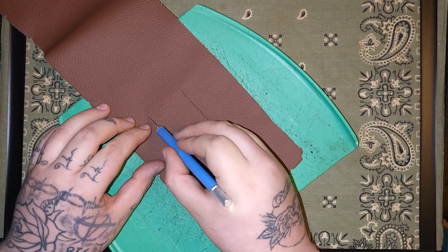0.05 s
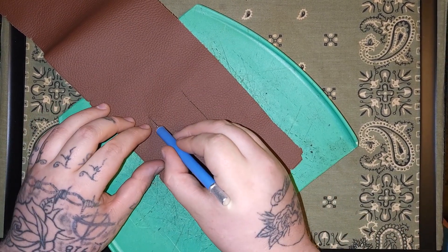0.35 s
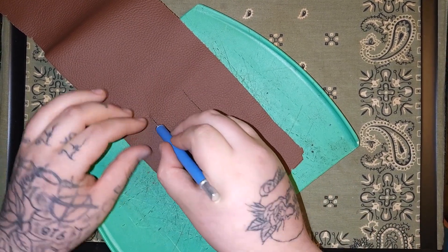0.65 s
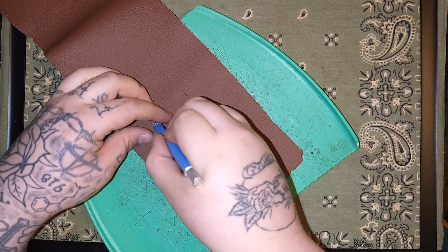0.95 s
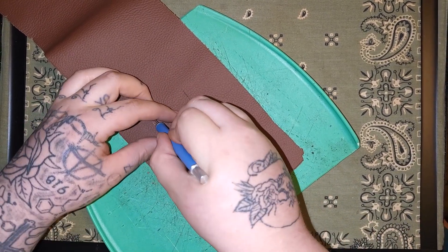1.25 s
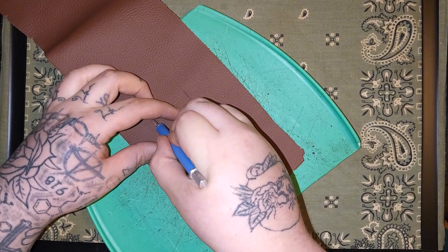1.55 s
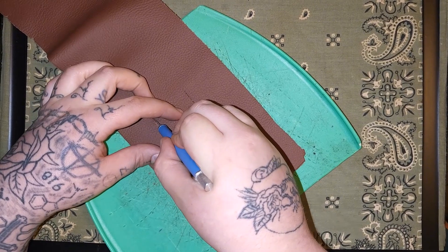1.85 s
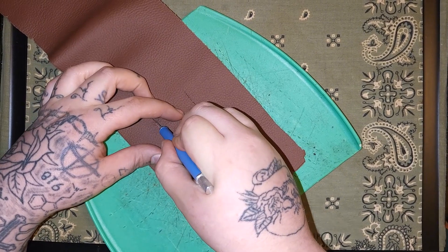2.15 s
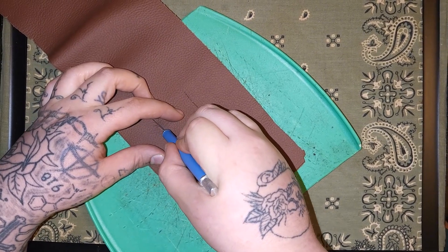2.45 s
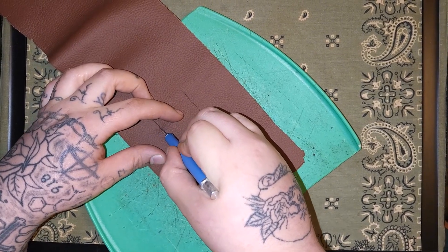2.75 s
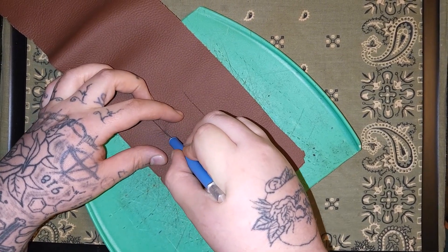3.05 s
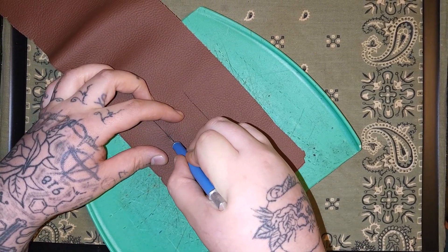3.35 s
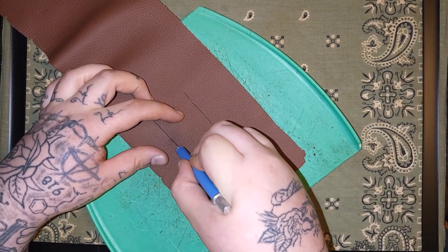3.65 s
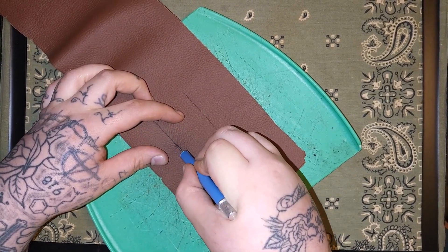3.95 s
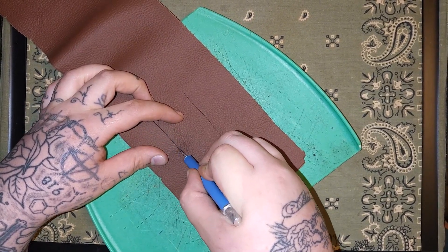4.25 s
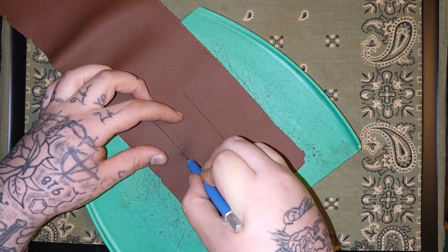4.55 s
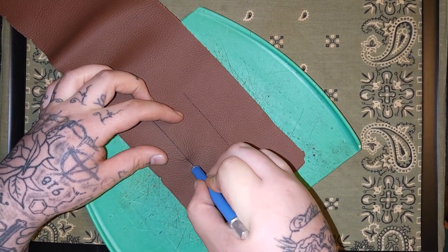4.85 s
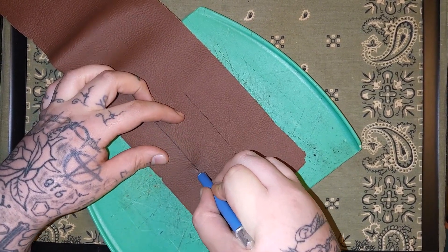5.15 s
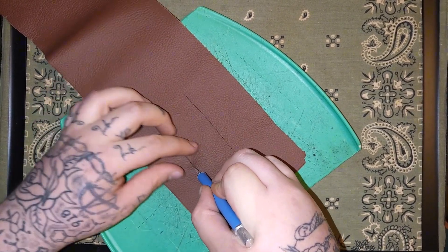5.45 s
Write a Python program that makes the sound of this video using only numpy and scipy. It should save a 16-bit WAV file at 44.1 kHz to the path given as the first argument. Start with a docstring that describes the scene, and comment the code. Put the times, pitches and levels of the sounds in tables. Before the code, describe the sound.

In a quiet room, a hand lands on leather over a plastic cutting mat with a soft thud and a brief rub. A hobby knife makes a few short, scratchy nicks, with one sharp click as the blade is set down. Then comes one long rasping cut in uneven pulls, growing louder as fibres crackle and snap. Small clicks and a faint slide end it. Everything sounds close.

```python
"""Cutting leather with a hobby knife

In a quiet room a hand lands on leather on a plastic cutting mat and slides into place. The blade is
set down with a click, nicks the hide a few times, then makes one long cut in a series of pulls.
Stick-slip friction at the blade drives the resonances of mat, knife and table, while snapping
fibres crackle on top."""
import sys
import numpy as np
from scipy import signal
from scipy.fft import rfft, irfft
from scipy.io import wavfile
from scipy.ndimage import uniform_filter1d, map_coordinates

SR = 44100
rng = np.random.default_rng(int(sys.argv[2]) if len(sys.argv) > 2 else 0)


def wav_record(signal):
    """Record a signal, one row per channel, as 16-bit PCM in the file named by sys.argv[1]."""
    frames = np.transpose(np.atleast_2d(signal))
    bounded = np.clip(frames, -1, 1)
    # unit amplitude maps onto the largest positive 16-bit level
    quanta = np.round(bounded * 32767).astype(np.int16)
    wavfile.write(sys.argv[1], SR, quanta)


N = 242991
TIME = np.arange(N) / SR
FRAME_TIME = TIME[::32]
BINS = np.fft.rfftfreq(8192, 1 / SR)

# spectrum of a snapping fibre: frequency_hz, level_db
FIBRE_SPECTRUM = [(2000, -37), (3700, -14), (4500, -3.5), (5200, -4.5), (6450, 0), (7400, -1.5), (8200, 5),
                  (9000, -15.5), (10500, -3.5), (11500, -1), (14000, -4.5), (16000, -6)]


def amp(db):
    """Decibels to amplitude ratio."""
    return 10 ** (np.asarray(db) / 20)


def unit_rms(x):
    """Normalisation to rms 1."""
    return x / np.sqrt(np.mean(x ** 2) + 1e-20)


def steadied(x, size=3000):
    """Division by the running rms holds the slow level at 1 and keeps the quick flutter."""
    return x / np.sqrt(uniform_filter1d(uniform_filter1d(x ** 2, size), size // 2) + 1e-9)


def curve_at(points, hz):
    """Interpolation on a log-frequency axis."""
    f, value = np.transpose(points)
    return np.interp(np.log(hz + 1), np.log(f + 1), value)


def add(mix, start_s, sound):
    """Superposition of a sound on the mix."""
    part = mix[round(start_s * SR):][:len(sound)]
    part += sound[:len(part)]


def peaks(hz, width, db, steep=1.886):
    """Gain on BINS of resonances whose powers add."""
    shape = 1 / (1 + ((BINS[:, None] - hz) / (width * 0.64)) ** 2) ** steep
    return np.sqrt(shape @ amp(db) ** 2)


def colour(x, gain):
    """Minimum-phase filter shaped by a gain on BINS: sharp attack, ringing after."""
    log_gain = np.log(np.maximum(gain / gain.max(), 1e-5))
    mirrored = np.concatenate([log_gain, log_gain[-2:0:-1]])
    response = np.fft.ifft(np.exp(np.conj(signal.hilbert(mirrored)))).real
    return signal.oaconvolve(x, response[:len(BINS)])[:len(x)]


def noise(spectrum):
    """Stationary noise of rms 1 with the given spectrum."""
    gain = amp(curve_at(spectrum, np.fft.rfftfreq(N, 1 / SR)))
    return unit_rms(irfft(rfft(rng.standard_normal(N)) * gain, N))


def wander(low_hz, high_hz):
    """Band-pass noise: a random drift of rms 1."""
    f = np.fft.rfftfreq(N, 1 / SR)
    gain = f / (f + low_hz) / (1 + (f / high_hz) ** 2)
    return unit_rms(irfft(rfft(rng.standard_normal(N)) * gain, N))


def grains(per_s, spread_db):
    """Poisson impulses of uneven size."""
    size = amp(spread_db * np.minimum(rng.exponential(1, N), 4)) * rng.choice([-1, 1], N)
    return unit_rms(size * (rng.random(N) < per_s / SR))


def swells(gestures, db, attack_s, release_s, arch_db, law=1):
    """Envelope in dB: each gesture rises, arches and dies, by 20 * law dB per attack or release."""
    start, length = np.transpose(gestures)[:2, :, None]
    age = FRAME_TIME - start
    arch = arch_db * (2 * np.clip(age / length, 0, 1) - 1) ** 2
    ends = 20 * (np.maximum(-age, 0) / attack_s + np.maximum(age - length, 0) / release_s)
    return np.max(db[:, None] - law * (arch + ends), axis=0)


def fader(db):
    """Interpolation from a level per frame to a gain per sample."""
    return np.interp(TIME, FRAME_TIME, amp(db))


def background(rumble_db=-60, air_db=-65, whine_db=-79.5, lean_db=-1, apart_db=-13):
    """Ambient noise: rumble and table sway are largely coherent at the two ports, hiss largely not."""
    # spectra of room rumble, table sway, hiss and a narrow band in it: frequency_hz, level_db
    rumble = [(12, -80), (20, 2), (64, 6), (102, 1.5), (120, -3), (155, -10.5), (236, -12), (256, -12.5),
              (277, -66), (300, -33), (390, -58), (660, -120)]
    sway = [(30, 11.5), (60, -20), (80, 16.5), (105, -0.5), (140, -3), (220, -38)]
    air = [(150, -60), (250, -2), (528, -1.5), (1140, -10), (1850, -12), (2530, -14.5), (2860, -13),
           (3280, -16.5), (4050, -13.5), (4410, -17.5), (6590, -22.5), (7310, -13), (9660, -33),
           (10700, -26.5), (16000, -23)]
    whine = [(3000, -48), (3850, -23), (4030, 2), (4220, -37), (5400, -58)]
    # sway under the weight of the arms: time_s, level_db
    arm_weight = [(0, -82), (0.6, -61.5), (2.6, -60), (3.6, -69), (4.5, -56), (5.5, -57.5)]
    leaning = amp(lean_db + np.interp(TIME, *np.transpose(arm_weight)))
    low = amp(rumble_db) * noise(rumble) + leaning * noise(sway)
    incoherent = [amp(air_db) * noise(air) + amp(whine_db) * noise(whine)
                  + amp(rumble_db + apart_db) * noise(rumble) for _ in range(2)]
    return low + np.array(incoherent) + 0.23 * amp(air_db) * noise(air)


def crack(spectrum, contact_s, size=2000):
    """Contact transient: a noise burst whose time constant is the contact time."""
    t = np.arange(size) / SR
    x = colour(rng.standard_normal(size) * np.exp(-t / contact_s), amp(curve_at(spectrum, BINS)))
    return x / np.sqrt(np.sum(x ** 2) / (contact_s * SR))


def ring(modes, rise_s=0.00084, size=8000):
    """Free vibration of a struck body: damped sines, rms 1 over the first few milliseconds."""
    t = np.arange(size) / SR
    x = sum(amp(db - 60 * t / t60) * np.sin(2 * np.pi * (hz * t + rng.random()))
            for hz, db, t60 in modes)
    x *= 1 - np.exp(-(t / rise_s) ** 2)
    return x / np.sqrt(np.mean(x[:size // 25] ** 2))


def taps():
    """Impact excitation: hard contacts mostly click and knock, soft ones mostly thud."""
    # blade, handle and fingers landing: start_s, click_db, knock_db, thud_db, thud_hz, contact_s
    contacts = [(0.533, -62, -59, -67, 300, 0.0033), (0.583, -62, -57.5, -61, 304, 0.0086),
                (0.595, -60, -56, -68, 300, 0.015), (0.608, -55, -60, -71, 310, 0.0051),
                (.648, -78, -64, -35.5, 251, 0.0033), (0.658, -80, -63, -41, 219, 0.0027),
                (1.274, -67, -56, -43, 336, 0.019), (1.3129, -35, -37.5, -45.5, 332, 0.0017),
                (1.3982, -56, -48, -59, 311, 0.0017), (1.5458, -24, -31, -36, 350.3, 0.0028),
                (1.5488, -25, -35, -39, 358, 0.0013), (3.206, -70, -52, -51, 339, .002),
                (5.084, -60, -59, -43.5, 344, .002), (5.291, -51, -53.5, -60, 342, 0.0007),
                (5.324, -42, -49, -55.5, 342, 0.00071), (5.3702, -31, -47, -66, 335, 0.0005)]
    # spectrum of a click: frequency_hz, level_db
    click = [(900, -9), (1700, 4), (2100, 7), (2450, -7), (3100, 0), (3700, -11), (4600, -0.5),
             (6400, -0.5), (7900, 7), (9200, -5.5), (11300, 5.5), (16000, -5)]
    # modes of the table struck from above: pitch_hz, level_db, t60_s
    knock = [(349, -20, 0.057), (523, 12.5, 0.0085), (790, 0, 0.053), (926, 6, 0.042), (1036, 4, 0.046),
             (1245, 1, 0.041), (1340, 7.5, 0.025), (1557, -6, 0.062)]
    # its modes under a soft blow: pitch_ratio, level_db, t60_s
    thud = [(.8, -21, 0.078), (1, -10, 0.095), (1.35, -10.5, 0.029)]
    out = np.zeros(N)
    for start_s, click_db, knock_db, thud_db, thud_hz, contact_s in contacts:
        add(out, start_s, amp(click_db) * crack(click, contact_s))
        add(out, start_s + 0.00089, amp(knock_db) * ring(knock))
        thud_modes = [(ratio * thud_hz, db, t60) for ratio, db, t60 in thud]
        add(out, start_s, amp(thud_db) * ring(thud_modes, rise_s=0.0017))
    return out


def hand_slides(hiss_gain_db=6.5, broadband_db=-9):
    """Sliding friction: skin on the grain gives fine, dense impulses that ring the hide."""
    # moves of the hand: start_s, length_s, rub_db, hiss_db
    slides = [(0.677, 0.071, -42, -52), (0.776, 0.097, -45.5, -55), (0.905, 0.053, -52.5, -63),
              (5.296, 0.055, -56, -55.5), (5.375, .015, -58.5, -53), (5.428, 0.035, -56.5, -65)]
    # modes of leather and mat: pitch_hz, width_hz, level_db
    hide_modes = [(347, 27, 1.5), (678, 107, -3.5), (1026, 52, 0.5), (1198, 40, 3), (1605, 60, -11),
                  (1890, 30, -3), (2110, 280, -8), (2498, 100, -8), (2880, 51, -35.5), (3380, 110, -17)]
    # spectra of the broad rub and the hiss of skin: frequency_hz, level_db
    rub_spectrum = [(150, -7), (300, -5), (480, -28), (700, -3), (1200, -9), (1450, -12.5), (2500, -10),
                    (3600, -12.5), (4500, -13.5), (6000, -26)]
    skin_spectrum = [(2240, -65), (3800, -26), (4500, -9), (6570, 4), (7960, 15.5), (8560, 7.5), (9310, 9),
                     (10300, 6), (11800, 6), (15200, 6), (16000, 14)]
    friction = grains(per_s=13000, spread_db=2.5) * amp(0.5 * wander(13, 80))
    broadband = amp(broadband_db + curve_at(rub_spectrum, BINS))
    body = np.hypot(peaks(*np.transpose(hide_modes), steep=1.94), broadband)
    rub = steadied(colour(friction, body))
    hiss = steadied(colour(friction, amp(curve_at(skin_spectrum, BINS))))
    rubbing, hissing = (fader(swells(slides, db, attack_s=0.034, release_s=0.083, arch_db=3.5))
                        for db in np.transpose(slides)[2:])
    return rub * rubbing + amp(hiss_gain_db) * hiss * hissing


def nicks(edge_law, fibre_law):
    """Brief loading by the tip: envelopes in dB of mat drag, edge rasp, fibres and table thrum."""
    # short strokes: start_s, length_s, drag_db, rasp_db, fibre_db, thrum_db
    strokes = [(0.983, 0.086, -48.5, -67.5, -53.5, -62), (1.126, 0.053, -48, -68.5, -60, -48),
               (1.275, 0.02, -52, -70, -61.5, -47), (1.313, 0.014, -58, -64, -56, -49),
               (1.398, 0.066, -46.5, -68.5, -56.5, -56), (1.512, 0.029, -49.5, -72, -63.5, -58),
               (1.558, 0.065, -39, -58, -48.5, -51.5), (1.701, 0.043, -49.5, -70, -65.5, -60),
               (1.855, 0.022, -60, -86, -76, -69), (1.981, 0.048, -47.5, -63.5, -59.5, -62),
               (2.048, 0.026, -48.5, -73, -68, -68), (2.18, 0.039, -56.5, -85, -82, -72),
               (2.297, 0.18, -46, -66.5, -65.5, -63), (2.353, 0.066, -38.5, -50, -47, -54.5),
               (2.511, 0.024, -42.5, -64.5, -58, -69), (2.724, 0.091, -37.5, -47.5, -44.5, -49)]
    return [swells(strokes, db, attack_s=0.033, release_s=0.054, arch_db=5, law=law)
            for db, law in zip(np.transpose(strokes)[2:], (1, edge_law, fibre_law, 1))]


def resonances(x, modes, travel):
    """Forced vibration: modes change strength as the driving point travels from 0 to 1."""
    hz, width, first_db, last_db = np.transpose(modes)
    first, last = (unit_rms(colour(x, peaks(hz, width, db))) for db in (first_db, last_db))
    return (1 - travel) * first + travel * last


def creak(jolts, pitch_hz=935, width_hz=74):
    """Resonance: one mode of the mat sings out under the tip before the cut deepens."""
    # strength against the other modes: time_s, level_db
    strength = [(1.6, -8), (2.0, 4), (3.3, -12.5), (4.0, -43)]
    mode = unit_rms(colour(jolts, peaks(pitch_hz, width_hz, db=[0])))
    return mode * amp(np.interp(TIME, *np.transpose(strength)))


def gap_echo(x, depth=0.3):
    """Comb filtering: one close reflection cuts notches that slide as the hand moves."""
    # path across the gap under the hand: time_s, delay_s
    gap = [(2.4, 0.00065), (3.8, 0.00048), (4.8, 0.000626)]
    delay = np.interp(TIME, *np.transpose(gap)) * SR
    return x - depth * map_coordinates(x, [np.arange(N) - delay], order=3)


def blade(mat_db=-1.5, fibre_db=0.44, table_db=-1.0, spray_s=0.0014):
    """Stick-slip friction: jolts ring mat, knife and table, and each frees a spray of snapping fibres."""
    # modes of the mat and of blade with handle: pitch_hz, width_hz, first_db, last_db
    mat_modes = [(555, 39, -9.5, -22), (686, 61, -13, -4.5), (803, 88, -24, 2.5), (893, 22, 2.5, 4.5),
                 (984, 88, 4, -14), (1102, 145, -0.5, -3), (1287, 57, 0, -1), (1401, 142, -5.5, -9.5),
                 (1553, 28, -5.5, -18), (1680, 72, -20, -15)]
    knife_modes = [(2116, 280, -11.5, 5), (2420, 240, -12, -2), (2534, 195, 2.5, 6), (2750, 124, 2.5, 10),
                   (3026, 200, 2.5, 0.5), (3346, 220, 1.5, -16), (3590, 320, -7, 0),
                   (4040, 1200, -11.5, -22)]
    # modes of the table beneath: pitch_hz, width_hz, level_db
    table_modes = [(249.7, 23, -11.5), (347.7, 12, 3.5), (381, 58, -7)]
    travel = np.interp(TIME, [3.0, 3.9, 4.4, 4.8], [0, .18, .5, 1])
    grip = amp(wander(5.8, 71))  # the hide is uneven, so the edge bites and eases
    slips = grains(per_s=640, spread_db=0.5)
    jolts = (slips + 0.56 * rng.standard_normal(N)) * grip
    spray = unit_rms(signal.lfilter([1], [1, -np.exp(-1 / (spray_s * SR))], abs(slips)))
    fine_snaps = grains(per_s=6000, spread_db=3.0) + rng.standard_normal(N)
    coarse_snaps = grains(per_s=110, spread_db=2.0)
    snaps = unit_rms(fine_snaps * (0.61 + spray) * grip) + 0.13 * coarse_snaps
    # dB per dB of a swell: the edge rasps only under load, and fibres need still more to snap
    laws = dict(edge_law=1.17, fibre_law=1.59)
    drag, rasp, tearing, thrum = map(fader, np.maximum(nicks(**laws), long_cut(**laws)))
    mat = steadied(resonances(jolts, mat_modes, travel) + creak(jolts)) * drag
    knife = steadied(resonances(snaps + 0.91 * jolts, knife_modes, travel)) * rasp
    fibres = steadied(gap_echo(colour(snaps, amp(curve_at(FIBRE_SPECTRUM, BINS))))) * tearing
    table = steadied(colour(jolts, peaks(*np.transpose(table_modes)))) * thrum
    return amp(mat_db) * mat + knife + amp(fibre_db) * fibres + amp(table_db) * table


def snags(jolt_gain_db=-7.0, snap_gain_db=-7.5):
    """Sudden release: the edge catches on a tough fibre, which snaps and leaves the mat ringing."""
    # the larger slips: start_s, jolt_db, snap_db
    catches = [(1.976, -44, -53), (2.318, -41.5, -64), (2.507, -48, -56), (2.71, -37.5, -52),
               (3.069, -45, -44), (3.211, -32.5, -58), (3.28, -34, -57), (3.343, -38, -60),
               (3.46, -30, -32), (4.094, -37, -59), (4.175, -31, -33), (4.616, -26, -31),
               (4.651, -27, -31.5), (4.691, -25, -51), (4.83, -26.5, -38), (4.881, -30, -34.5),
               (4.946, -25, -38), (4.978, -27, -38), (5.018, -23.5, -42)]
    # modes of the jerked mat: pitch_hz, level_db, t60_s
    jolt_modes = [(886, -14, 0.06), (951, 10.5, 0.034), (1337, 1.5, 0.026)]
    out = np.zeros(N)
    for start_s, jolt_db, snap_db in catches:
        add(out, start_s, amp(jolt_db + jolt_gain_db) * ring(jolt_modes))
        add(out, start_s, amp(snap_db + snap_gain_db) * crack(FIBRE_SPECTRUM, contact_s=0.002))
    return out


def long_cut(edge_law, fibre_law, steady_rasp_db=-18, steady_fibre_db=-22.5):
    """Sustained loading with pulls standing out: envelopes in dB of drag, rasp, fibres and thrum."""
    # steady force on the blade: time_s, level_db
    steady_force = [(2.85, -72), (2.95, -48), (3.6, -45.5), (4.4, -41), (4.9, -42.5), (5.15, -47),
                    (5.19, -75)]
    # pulls of the hand: start_s, length_s, force_db, relative_rasp_db, relative_fibre_db
    pulls = [(2.888, 0.039, -46.5, -17.5, -15.5), (2.989, 0.14, -42, -11.5, -13),
             (3.143, 0.071, -39.5, -9.5, -11), (3.29, 0.027, -39.5, -13.5, -16),
             (3.341, 0.054, -41, -16.5, -18), (3.467, 0.014, -34, -12, -12.5),
             (3.499, 0.029, -39, -17, -14.5), (3.634, 0.042, -37, -10.5, -11),
             (3.709, 0.0079, -37.5, -11.5, -11.5), (3.778, 0.26, -40.5, -12.5, -17.5),
             (3.916, 0.13, -36.5, -11, -13), (4.123, 0.015, -36.5, -12, -18),
             (4.168, 0.033, -34, -13.5, -17.5), (4.268, 0.071, -35.5, -10.5, -13.5),
             (4.42, 0.081, -36.5, -13.5, -18), (4.562, 0.19, -36, -12.5, -16),
             (4.661, 0.14, -34.5, -12.5, -16), (4.828, 0.09, -36, -15, -19.5),
             (4.972, 0.087, -31, -16, -14.5), (5.074, 0.078, -31.5, -16, -14.5)]
    # table thrum against the drag, falling as the cut goes on: time_s, relative_db
    thrum = [(3.0, -14), (4.1, -17), (5.1, -23)]
    steady = np.interp(FRAME_TIME, *np.transpose(steady_force), left=-np.inf, right=-np.inf)
    force, bite, tear = np.transpose(pulls)[2:]
    shape = dict(attack_s=0.043, release_s=0.035, arch_db=1.5)
    drag = np.maximum(steady, swells(pulls, force, **shape))
    rasp = np.maximum(steady + steady_rasp_db, swells(pulls, force + bite, **shape, law=edge_law))
    fibres = np.maximum(steady + steady_fibre_db, swells(pulls, force + tear, **shape, law=fibre_law))
    return drag, rasp, fibres, drag + np.interp(FRAME_TIME, *np.transpose(thrum))


def ports(x):
    """Path difference: two microphone ports, unlike in colour and phase, hear the moving blade."""
    # earlier arrival at the left port: time_s, lead_samples
    arrival = [(1.5, 1.15), (2.4, 0.64), (3.7, 1.6), (5.1, 2.21)]
    # left minus right level: frequency_hz, difference_db
    level_difference = [(100, 12), (300, 1), (1300, 2), (2600, 9.5), (3500, 2.5), (5000, 7), (8000, 6.5),
                        (9500, 14), (11400, -9.5), (13000, 2), (16000, -2)]
    # left minus right phase: frequency_hz, difference_rad
    phase_difference = [(100, 0), (1200, .05), (1650, .4), (2000, 3.0), (2600, 1.6), (3200, -1.0),
                        (3700, -2.8), (4300, -1.2), (4900, .2), (16000, 0)]
    lead = np.interp(TIME, *np.transpose(arrival))
    pair = np.array([x, map_coordinates(x, [np.arange(N) - lead], order=5)])
    f, side = np.fft.rfftfreq(N, 1 / SR), np.array([[.5], [-.5]])
    phase = np.exp(1j * side * curve_at(phase_difference, f))
    gain = amp(side * curve_at(level_difference, f))
    return irfft(rfft(pair) * phase * gain, N)


def scatter(x, spread_s=0.004, above_hz=2200, count=6, size=512):
    """Scattering: the hands throw the treble back along short paths that shift as they move."""
    paths = rng.standard_normal((count, 2, size)) * np.exp(-np.arange(size) / (spread_s * SR))
    paths /= np.linalg.norm(paths, axis=2, keepdims=True)
    share = np.array([wander(0.69, 2.4) for _ in range(count)])
    share /= np.linalg.norm(share, axis=0)
    treble = signal.sosfilt(signal.butter(2, above_hz, "high", fs=SR, output="sos"), x)
    return signal.oaconvolve((share * treble)[:, None], paths, axes=2).sum(0)[:, :N]


def room(x, size=16384):
    """Reverberation of a small furnished room: a short tail that dies fastest in the top treble."""
    # reverberation time: frequency_hz, t60_s
    decay = [(150, 0.14), (1000, 0.15), (4000, 0.24), (15000, 0.013)]
    onset = np.arange(size) / SR > .005
    hz, age, spectra = signal.stft(rng.standard_normal((2, size)) * onset, SR, nperseg=256)
    tail = signal.istft(spectra * amp(-60 * age / curve_at(decay, hz)[:, None]), SR, nperseg=256)[1]
    return signal.oaconvolve(x[None], tail / np.linalg.norm(tail[0]), axes=1)[:, :N]


def scene(scatter_db=-4, room_db=-15):
    """Superposition of direct, scattered and reverberant sound over the quiet of the room."""
    work = blade() + snags() + taps() + hand_slides()
    return ports(work) + amp(scatter_db) * scatter(work) + amp(room_db) * room(work) + background()


def record(dry, notch_hz=9500, cutoff_hz=15900):
    """Cancellation in the microphone ports removes a narrow treble band; a low-pass limits the top."""
    notched = signal.lfilter(*signal.iirnotch(notch_hz, Q=7, fs=SR), dry)
    low_pass = signal.firwin(511, cutoff_hz, window=("kaiser", 9), fs=SR)
    return signal.oaconvolve(notched, low_pass[None], "same", axes=1)


dry = scene()
out = record(dry)
wav_record(out)
```